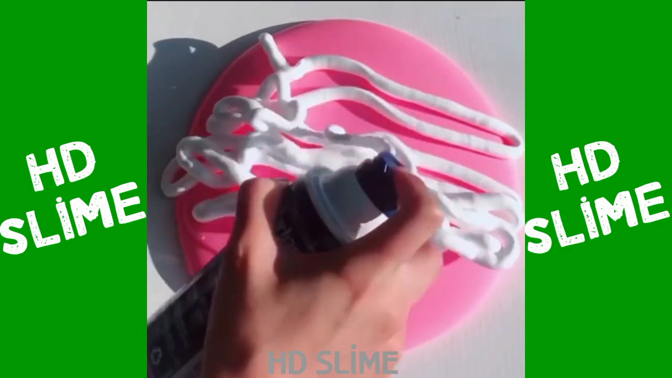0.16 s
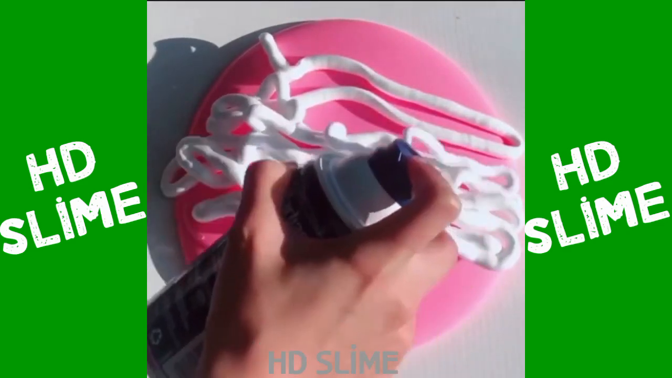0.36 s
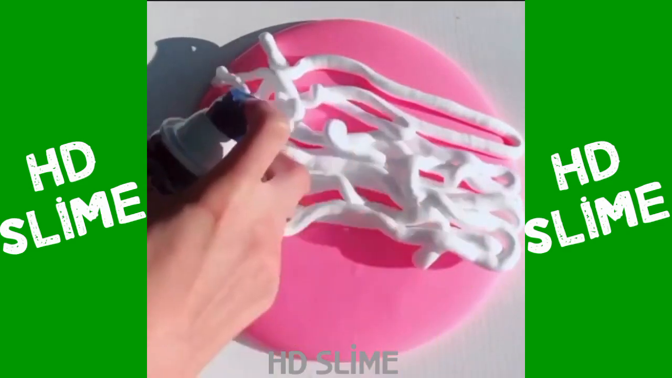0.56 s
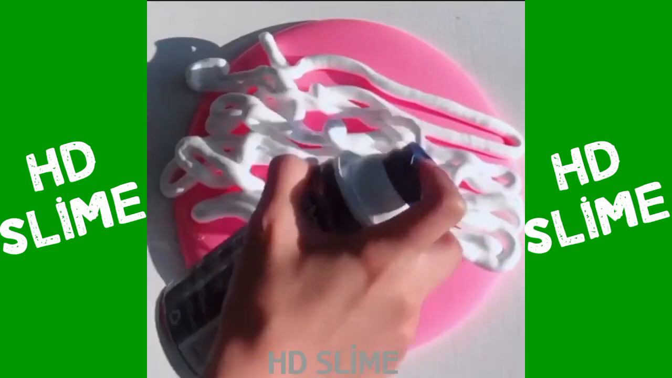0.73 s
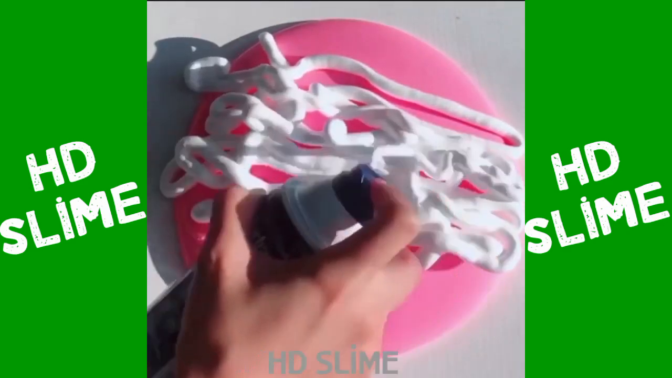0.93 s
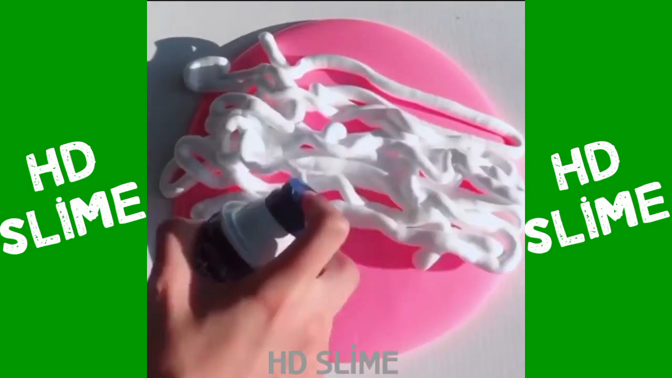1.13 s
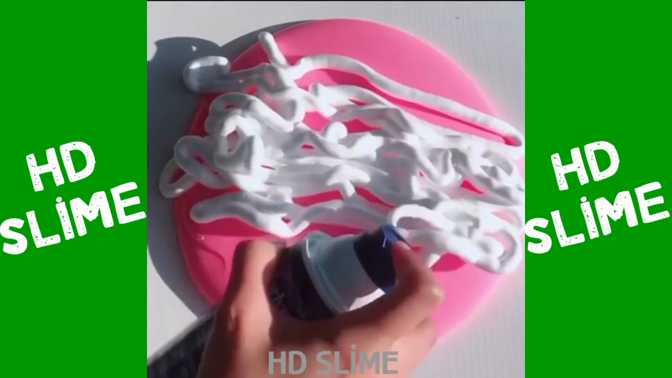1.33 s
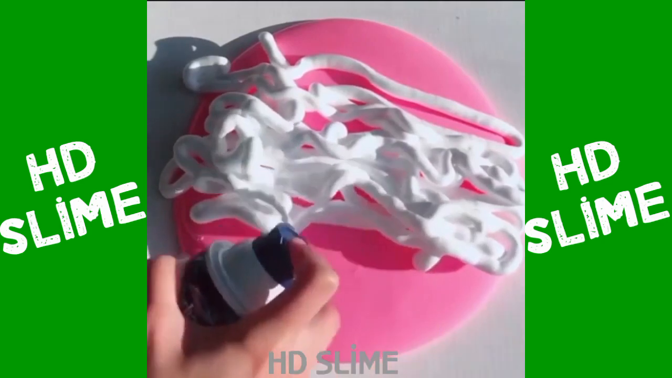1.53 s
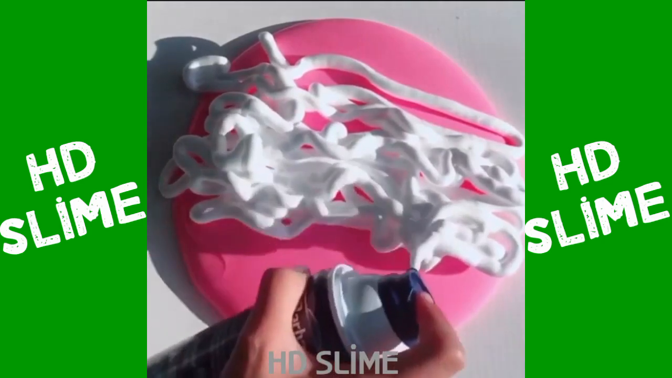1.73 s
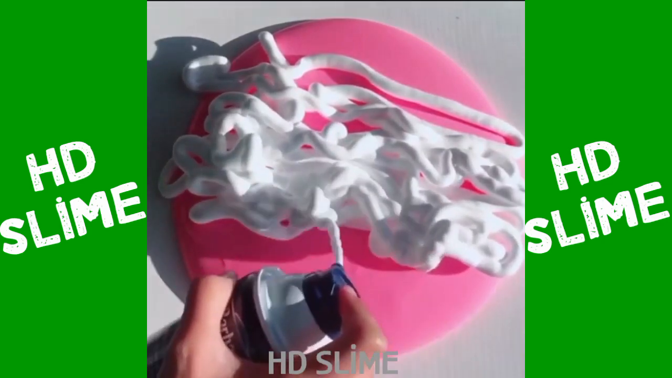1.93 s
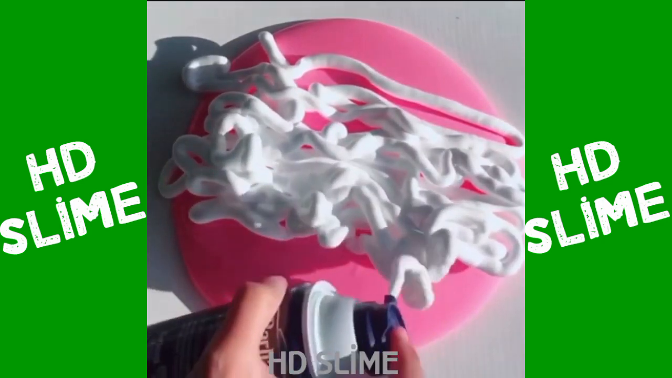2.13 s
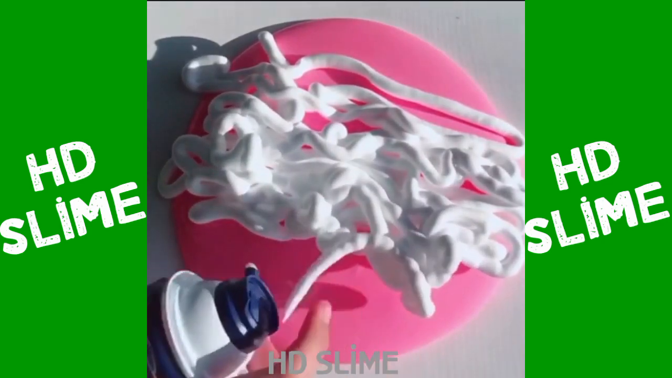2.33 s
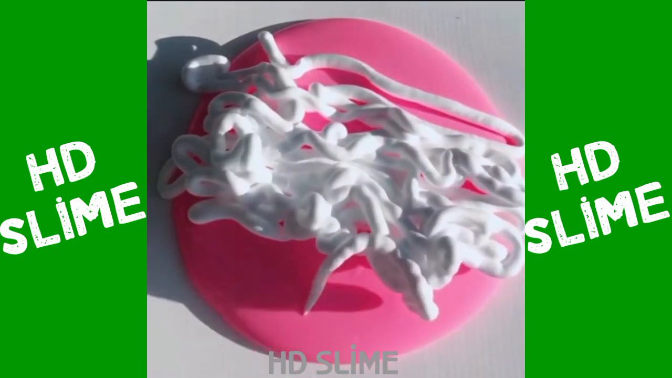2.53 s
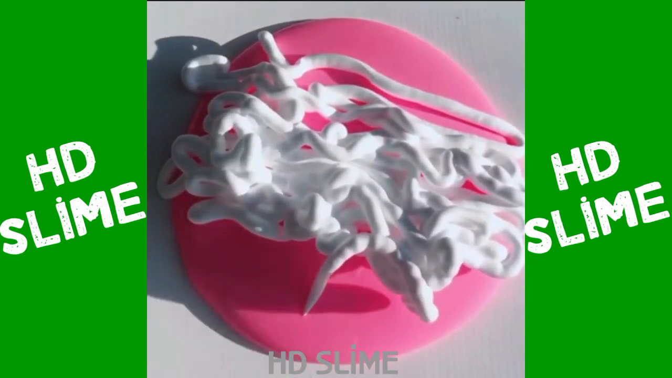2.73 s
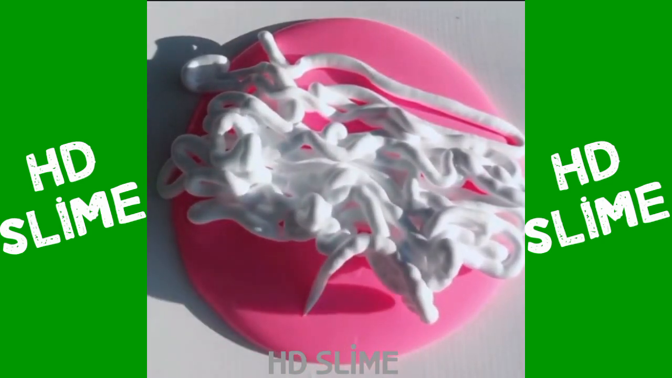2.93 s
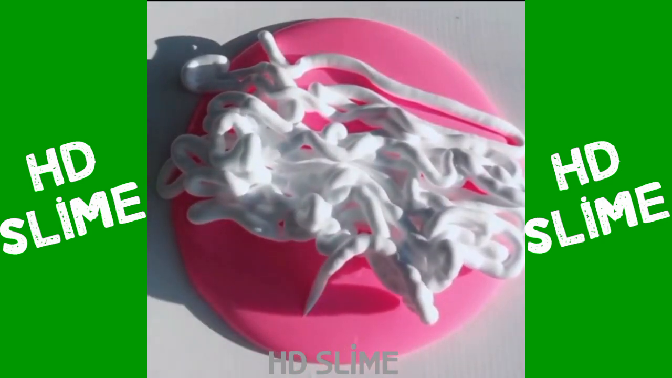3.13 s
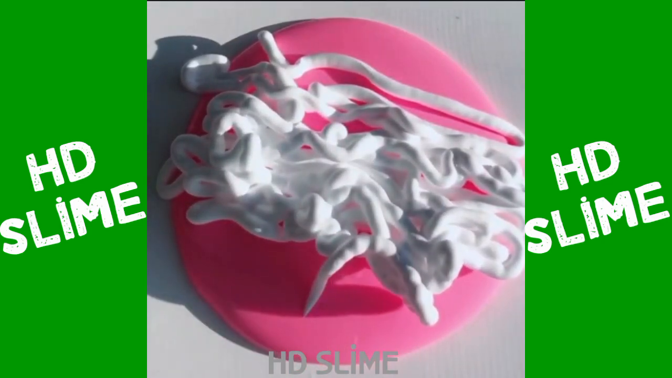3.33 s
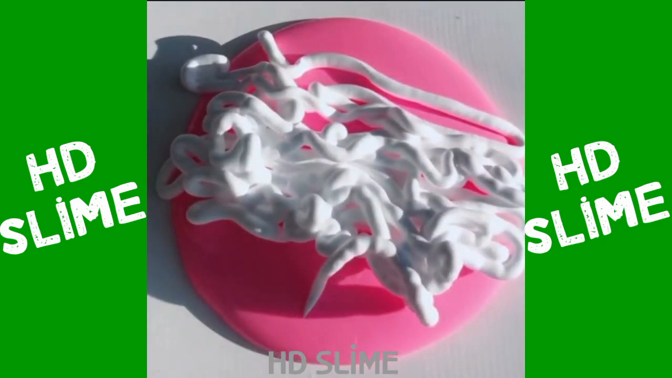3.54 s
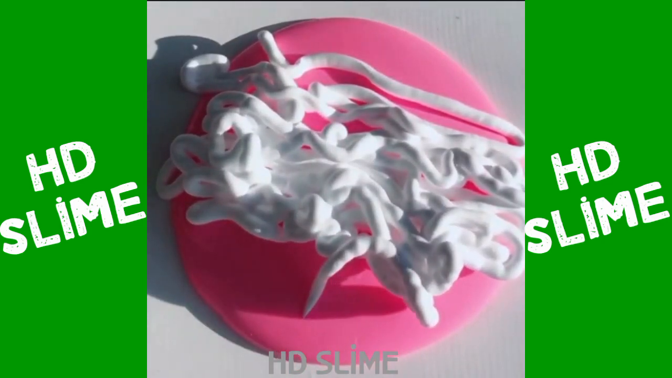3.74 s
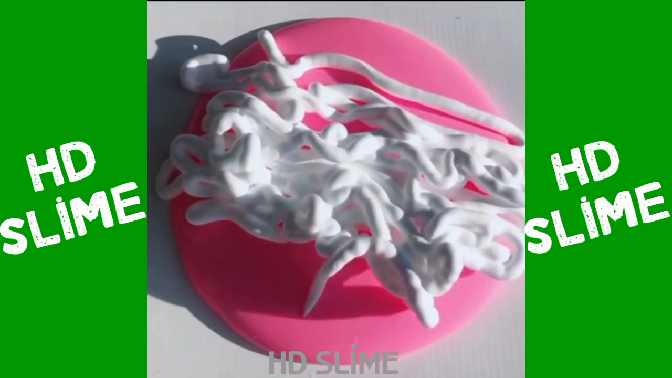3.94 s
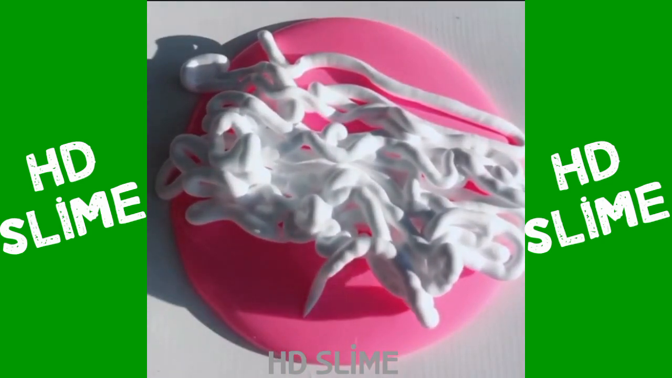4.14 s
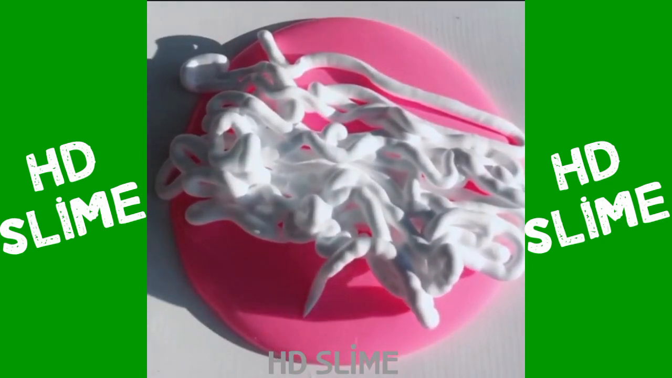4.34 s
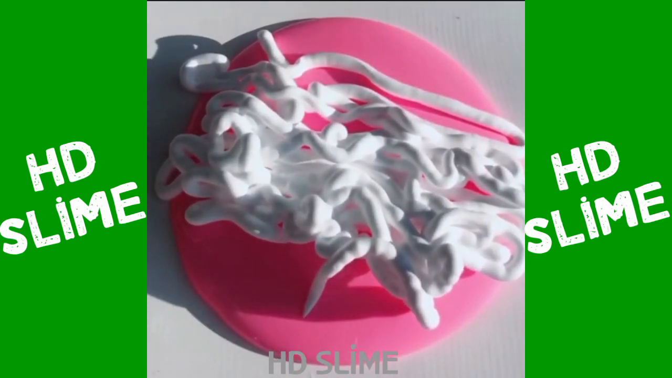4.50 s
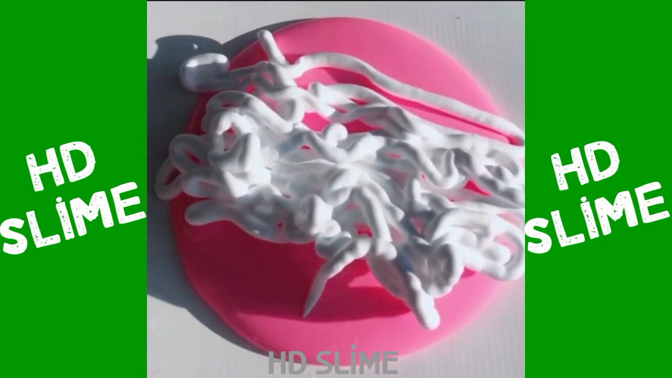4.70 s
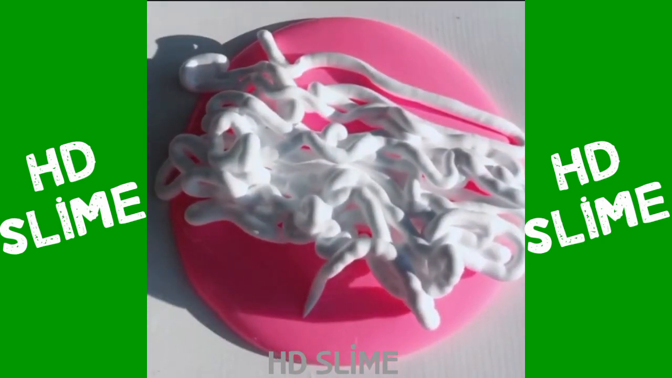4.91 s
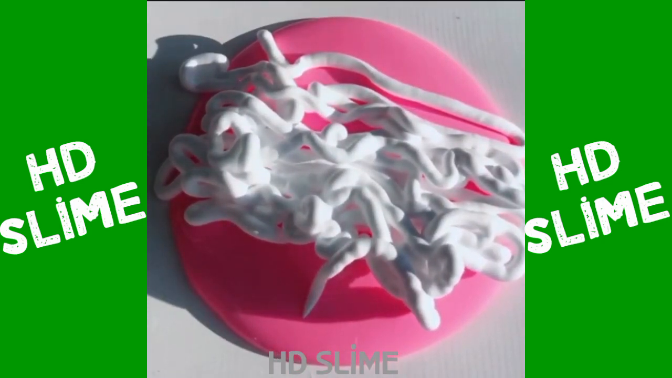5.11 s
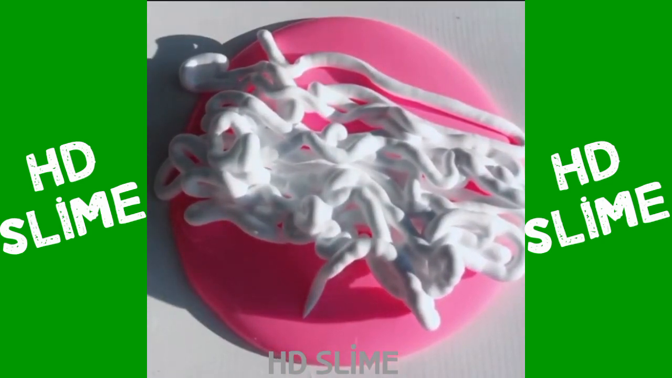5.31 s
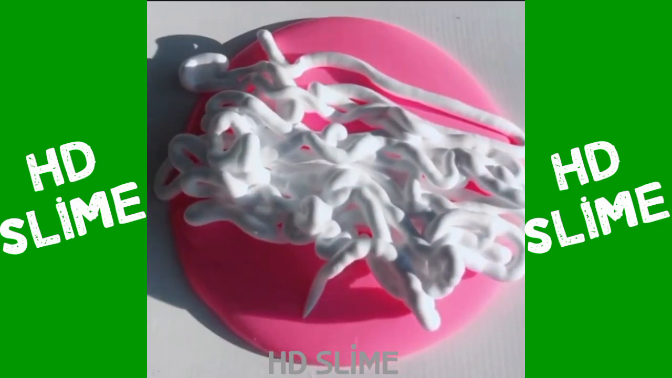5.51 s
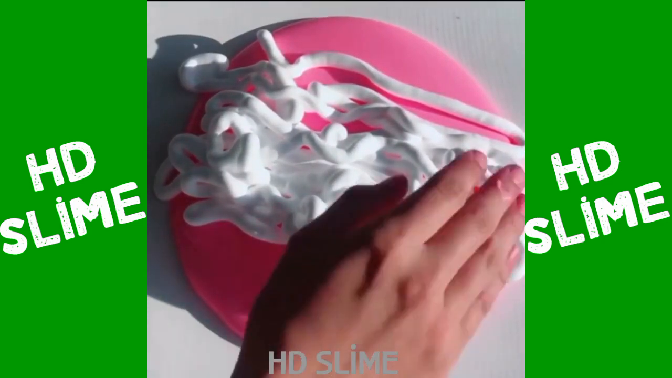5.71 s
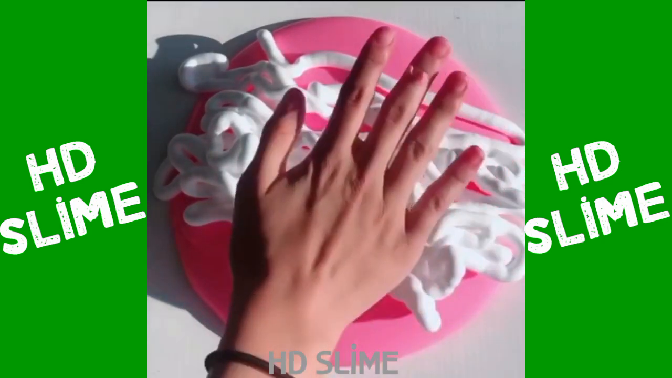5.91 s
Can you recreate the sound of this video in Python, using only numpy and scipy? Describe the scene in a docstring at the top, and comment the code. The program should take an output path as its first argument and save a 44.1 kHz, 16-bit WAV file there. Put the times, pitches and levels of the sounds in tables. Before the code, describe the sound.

Shaving foam jets from an aerosol already spraying at the start, hissing with a nasal spout resonance and fine crackle, gently pulsing as the hand sweeps. The valve closes quickly. The quiet indoor background holds soft hum, rumble and air, with delicate bubble ticks. Then the can knocks dully on the table, a light bump before a heavier thud, and isolated pops continue. Close, mono, slightly dull on top.

```python
"""An aerosol can lays shaving foam onto slime for about two seconds, close to a mono phone microphone.
At first the jet hisses through the spout's resonances, crackling with tiny bubbles, until the valve shuts.
Then the foam settles with faint ticks; from about 4 s the can slides and lands on the table in soft, hollow
thumps, and a few last bubbles pop. Room rumble, air hiss, a hum that later fades and a faint fizz lie beneath.
The spray is shaped noise and random bursts; the blows and bubbles are sets of decaying modes."""
import sys
import numpy as np
from scipy import signal
from scipy.fft import rfft, irfft
from scipy.io import wavfile
from scipy.ndimage import map_coordinates

SR = 44100
rng = np.random.default_rng(int(sys.argv[2]) if len(sys.argv) > 2 else 0)


def wrap_up_sound(samples):
    """Save the sound to the file named by the first command line argument, as 16-bit audio."""
    columns = np.atleast_2d(samples).T
    # keep every value between -1 and 1, then stretch to whole-number steps
    tamed = np.clip(columns, -1, 1)
    steps = np.round(tamed * 32767).astype(np.int16)
    wavfile.write(sys.argv[1], SR, steps)


N = 262816

# Voices of the spray, ahead of its final trim:
# [level upright/dB, swing with the sweep/dB, change when tipped/dB]
HISS_LEVEL = (-43, 0.29, 1.4)
SPOUT_LOW_LEVEL = (-46.5, 1.1, 1.0)
SPOUT_HIGH_LEVEL = (-46, 0.81, -9)
# Colour of the free jet: [f/Hz, relative level per Hz/dB]
JET_COLOUR = [(60, -13), (220, 0), (450, 0.5), (1400, -8), (1900, 0.5), (3100, 6.5), (5600, 1.5),
              (6600, 2.5), (7200, 4), (7800, 0), (8600, 3.5), (9500, 2.5), (10600, 0), (11300, 4),
              (11900, 1)]
# Spout resonances around two main tunings: [frequency ratio, width of one filter pass/Hz, relative level/dB]
SPOUT_LOW_MODES = [(.838, 140, -12.5), (.92, 280, -10), (1.0, 230, 0), (1.05, 232, -8)]
SPOUT_HIGH_MODES = [(.83, 230, -7.5), (1.0, 620, 0.5), (1.075, 382, -21)]
# The can tips onto its side towards the end: [t/s, tilt 0-1]
TILT = [(1.55, 0.01), (1.8, .45), (2.0, .85), (2.16, 1)]
# Spurts of foam make the main resonance flare or dip: [t/s, level change/dB]
SPURTS = [(.04, 1.5), (.09, -0.5), (.54, 5.5), (1.07, 5), (1.2, 4.5), (1.515, 4.5), (1.975, 7.5),
          (2.08, 3.5), (2.135, 4.5)]
# Foam builds up in the spout and fills out the sound below its main resonance:
# [f/Hz, width of one filter pass/Hz, level at the start/dB, growth/dB per s]
SPOUT_CLOG = (2143, 232, -61.5, 5)
# A thin edge whistle: [f/Hz, width of one filter pass/Hz, level against the hiss/dB, change when tipped/dB]
WHISTLE = (6950, 260, -21.5, 1.5)
# Gas pockets spit from the spout: [t/s, level/dB, f/Hz, width of one filter pass/Hz, half length/s]
SPITS = [(1.377, -52, 616, 900, .005), (2.134, -40, 2680, 580, .012)]
# The can meets the table: [t/s, thump level/dB, tap level/dB, table pitch ratio, table time ratio]
BLOWS = [(4.1519, -28.5, -35, 1.03, 0.77), (4.256, -42.5, -60, 0.92, 0.97), (4.302, -43, -41.5, 1.0, 0.77),
         (4.312, -33, -49, 1.04, 0.74), (4.4265, -15.5, -25, 1.0, 0.98), (4.477, -43, -41, 1.0, 1.6),
         (4.745, -36, -68, 0.49, 0.76)]
# Table modes, ahead of each blow's ratios: [f/Hz, relative level/dB, time to the top of the swell/s]
TABLE_MODES = [(104.5, -15.5, 0.02), (134, -18.5, 0.028), (172.5, 1.5, 0.014), (199.7, -17.5, 0.029),
               (291.4, -11, 0.017), (342, -17.5, .016), (596, -23, 0.01), (727, -25, 0.0069)]
# Modes of the can's rim: [f/Hz, relative level/dB, t60/s]
RIM_MODES = [(398, 6, 0.034), (824, -1.5, 0.022), (965, -7, 0.015), (1190, -9.5, 0.023),
             (1360, -7.5, 0.031), (1510, -11, 0.019), (1810, -15, 0.019), (2460, -19, .018)]
# The base slides before it lands: [t/s, level/dB, f/Hz, width of one filter pass/Hz, half length/s (sign unused)]
SLIDE = (4, -56, 650, 900, -0.05)
# Colour of the room's answer to a blow: [f/Hz, relative level per Hz/dB]
TAIL_COLOUR = [(60, -25), (170, 7), (240, -3), (320, -10), (500, -15), (800, -17.5), (1500, -22),
               (2200, -43), (5000, -55)]
# Larger bubbles burst in the foam: [t/s, level of the impulse that sets off the modes/dB]
POPS = [(3.050, -50), (3.357, -44), (3.666, -49), (4.689, -43), (5.2838, -29), (5.713, -49), (5.918, -42)]
# Modes of a bursting bubble: [f/Hz, relative level/dB, t60/s]
BUBBLE_MODES = [(4080, -14, 0.0081), (6170, -10.5, 0.0045), (7850, -8, 0.0027), (9300, -4, 0.0017),
                (11100, -16, 0.0045)]
# Patches of foam collapse with a fine fizz: [t/s, level/dB, half length/s]
FIZZES = [(2.77, -72, .05), (2.943, -64.5, 0.045), (5.4, -69, 0.053)]
# Colours of the room's rumble and air: [f/Hz, relative level per Hz/dB]
RUMBLE_COLOUR = [(15, -37), (30, -24), (40, -12), (52, 1.5), (64, -3), (76, -1.5), (88, -7.5), (125, -8),
                 (165, -11.5), (195, -15.5), (250, -18), (320, -15.5), (480, -26), (700, -60)]
AIR_COLOUR = [(300, -30), (500, -2), (660, 4.5), (1000, -2.5), (1700, -6.5), (2800, -7.5), (4300, -9),
              (4900, -13), (5500, -11.5), (7000, -15.5), (7800, -19), (9300, -17.5), (10500, -19.5),
              (11500, -21.5)]
# Room hum: [f/Hz, width of one filter pass/Hz, relative gain/dB]
HUM_BANDS = [(74.25, 9.2, -0.5), (129.9, 16.5, -8.5)]

VALVE_SHUT_S, VALVE_CLOSE_S = 2.164, 0.006  # moment; time constant of the close
SWEEP_S, FIRST_TURN_S = 0.505, 0.078  # the hand's round trip; first turn, where the swell peaks
SPOUT_LOW_HZ, SPOUT_HIGH_HZ = (2543, 2485), (4164, 4147)  # main tunings: upright, tipped
SPURT_HALF_S = 0.013
TABLE_LAG_S = 0.00192  # thump starts this long after the rim's tap
FIZZ_REST_DB = -76.5
RUMBLE_DB, AIR_DB = -47, -55.5
HUM_DB, HUM_HOLD_S, HUM_FADE_DB_PER_S = -49.5, 2.46, 6.5
CUTOFF_HZ = 11950


def spray():
    """Gas rushes through the spout; its voices swell with the hand, change with tilt and die with the valve."""
    t = np.arange(N) / SR
    sweep = np.cos(2 * np.pi * (t - FIRST_TURN_S) / SWEEP_S)
    tilt = np.interp(t, *np.transpose(TILT))

    def voice_db(upright_db, swing_db, tipped_db):
        """Level of one voice as the can sweeps and tips."""
        return upright_db + swing_db * sweep + tipped_db * tilt

    def tuning_hz(upright, tipped):
        """Resonance tuning glides as the can tips."""
        return upright + (tipped - upright) * tilt

    hiss_db = voice_db(*HISS_LEVEL)
    spurt_db = sum(db * swell(s, SPURT_HALF_S) for s, db in SPURTS)
    hiss = from_db(hiss_db + 0.42 * drift(10)) * coloured(turbulence(grain=1.0), JET_COLOUR)

    low = spout(SPOUT_LOW_MODES, tuning_hz(*SPOUT_LOW_HZ), flutter_db=0.6, wander=0.012)
    low *= from_db(voice_db(*SPOUT_LOW_LEVEL) + spurt_db)
    high = spout(SPOUT_HIGH_MODES, tuning_hz(*SPOUT_HIGH_HZ), flutter_db=1.3, wander=0.011)
    high *= from_db(voice_db(*SPOUT_HIGH_LEVEL))

    hz, width, start_db, growth = SPOUT_CLOG
    clog_db = start_db + growth * np.minimum(t, VALVE_SHUT_S) + 0.5 * spurt_db
    clog = from_db(clog_db) * noise_band(hz, width)

    hz, width, db, tipped_db = WHISTLE
    whistle_db = hiss_db + db + tipped_db * tilt + 3.8 * drift(4.3)
    whistle = from_db(whistle_db) * noise_band(hz, width)

    jet = hiss + low + high + clog + whistle
    for s, db, hz, width, half_s in SPITS:
        jet += from_db(db) * swell(s, half_s) * noise_band(hz, width)

    since_shut = np.maximum(t - VALVE_SHUT_S, 0)
    # A quick close over a quieter 50 ms tail; both hold steady until the valve shuts.
    valve = np.exp(-since_shut / VALVE_CLOSE_S) + from_db(-13.5) * np.exp(-since_shut / 0.05)
    trim = from_db(-1.06 + 0.22 * drift(70))
    return reflected(jet * valve * trim, strength=0.23, sway_s=0.0001)


def turbulence(grain):
    """Rushing gas as white noise, mixed with the bursts of expanding foam."""
    return rng.standard_normal(N) + grain * crackle(per_s=5000, spread_db=3.0)


def spout(modes, tuning_hz, flutter_db, wander):
    """The spout's resonances swell and shift as plugs of foam pass through; rms 1."""
    centre = np.mean(tuning_hz)
    out = np.zeros(N)
    for ratio, width, db in modes:
        gain = from_db(db + flutter_db * drift(20))
        out += gain * resonate(turbulence(grain=0.75), ratio * centre, width)
    # Reading faster or slower bends the pitch.
    speed = tuning_hz / centre * (1 + wander * drift(13.83))
    return rms_one(map_coordinates(out, [np.cumsum(speed)], order=3, mode="mirror"))


def reflected(x, strength, sway_s):
    """Hand, table and phone throw the hiss back along paths whose lengths waver slowly at random."""
    paths_s = (0.0009, 0.0022, 0.0031, 0.0048)
    echoes = np.zeros(N)
    for lag_s in paths_s:
        place = np.arange(N) - SR * (lag_s + sway_s * drift(1.5))
        echoes += map_coordinates(x, [place], order=3, mode="mirror")
    return (x + strength * echoes) / np.sqrt(1 + len(paths_s) * strength ** 2)


def can_on_table():
    """The can slides, its rim taps, the table's modes swell and fade, and the room answers with noise."""
    t = np.arange(SR // 2) / SR
    contact, tail_level = np.zeros(N), np.zeros(N)
    for s, thump_db, tap_db, pitch, ring in BLOWS:
        add(contact, s + TABLE_LAG_S, from_db(thump_db) * table_thump(t, pitch, ring))
        soft_onset = 1 - np.exp(-t / 0.001)
        add(contact, s, from_db(tap_db) * struck(RIM_MODES, t) * soft_onset)
        tail = np.exp(-t / 0.081) * (1 - np.exp(-t / 0.0039))
        add(tail_level, s, from_db(thump_db - 19.0) * tail)
    s, db, hz, width, half_s = SLIDE
    slide = from_db(db) * swell(s, half_s) * noise_band(hz, width)
    return contact + slide + tail_level * coloured(rng.standard_normal(N), TAIL_COLOUR)


def table_thump(t, pitch, ring):
    """Table modes swell to a peak and fade, scaled in pitch and time by the blow."""
    age = t / ring
    body = np.zeros(len(t))
    for hz, db, rise in TABLE_MODES:
        envelope = age / rise * np.exp(1 - age / rise)
        body += from_db(db) * envelope * np.sin(2 * np.pi * hz * pitch * t)
    return body


def settling_foam():
    """Impulses ring the modes of bursting bubbles: larger pops, faint ticks and a fine fizz."""
    burst = struck(BUBBLE_MODES, np.arange(SR // 20) / SR)
    clicks = from_db(-80) * crackle(per_s=220, spread_db=3.0)
    for s, db in POPS:
        add(clicks, s, from_db([db]))
    pops = signal.fftconvolve(clicks, burst)[:N]
    fizz = rms_one(signal.fftconvolve(crackle(per_s=3000, spread_db=0.5), burst)[:N])
    collapse = from_db(FIZZ_REST_DB) + sum(from_db(db) * swell(s, half_s) for s, db, half_s in FIZZES)
    return pops + collapse * fizz


def room_noise():
    """Shaped noise makes a low rumble, a wavering hum that fades, and soft air with a restless middle."""
    rumble = from_db(RUMBLE_DB + 1.0 * drift(2.6)) * coloured(rng.standard_normal(N), RUMBLE_COLOUR)
    hum = np.zeros(N)
    for hz, width, db in HUM_BANDS:
        hum += from_db(db) * resonate(rng.standard_normal(N), hz, width)
    hum_db = HUM_DB - HUM_FADE_DB_PER_S * np.maximum(np.arange(N) / SR - HUM_HOLD_S, 0)
    air = from_db(AIR_DB + 0.36 * drift(13)) * coloured(rng.standard_normal(N), AIR_COLOUR)
    restless = from_db(-64.0 + 3.25 * drift(20)) * noise_band(884, 940)
    return rumble + from_db(hum_db) * rms_one(hum) + air + restless


def crackle(per_s, spread_db):
    """Random single-sample bursts of uneven size and either sign; rms 1."""
    sizes = from_db(spread_db * np.minimum(rng.exponential(1, N), 4))
    hits = rng.random(N) < per_s / SR
    return rms_one(sizes * rng.choice([-1, 1], N) * hits)


def struck(modes, t):
    """Decaying sines set off at once, each in a random phase of its own."""
    out = np.zeros(len(t))
    for hz, db, t60 in modes:
        decay = np.exp(-np.log(1000) * t / t60)
        out += from_db(db) * decay * np.sin(2 * np.pi * (hz * t + rng.random()))
    return out


def resonate(x, hz, width_hz):
    """A steep resonance: two equal band-passes in a row, gain about 1 on top."""
    r = np.exp(-np.pi * width_hz / SR)
    b = (1 - r * r) / 2 * np.array([1, 0, -1])
    a = [1, -2 * r * np.cos(2 * np.pi * hz / SR), r * r]
    return signal.lfilter(b, a, signal.lfilter(b, a, x))


def noise_band(hz, width_hz):
    """White noise through one steep resonance; rms 1."""
    return rms_one(resonate(rng.standard_normal(N), hz, width_hz))


def coloured(x, points):
    """Shape a white signal's spectrum, with levels joined along log frequency; rms 1."""
    hz, db = np.transpose(points)
    bins = np.maximum(np.arange(N // 2 + 1) * SR / N, 1)
    gain = from_db(np.interp(np.log(bins), np.log(hz), db))
    return rms_one(irfft(rfft(x) * gain, N))


def drift(rate_hz):
    """Random wander: noise rolled off above a rate; rms 1."""
    bins = np.arange(N // 2 + 1) * SR / N
    return rms_one(irfft(rfft(rng.standard_normal(N)) / (1 + (bins / rate_hz) ** 2), N))


def swell(s, half_s):
    """A smooth rise and fall of height 1, down to 1/e at half_s either side."""
    return np.exp(-((np.arange(N) / SR - s) / half_s) ** 2)


def add(out, s, sound):
    """Mix a sound in at a time in seconds."""
    i = round(s * SR)
    out[i:i + len(sound)] += sound[:N - i]


def from_db(db):
    """Decibels to amplitude gain."""
    return 10 ** (np.asarray(db) / 20)


def rms_one(x):
    """Scale to unit power."""
    return x / np.sqrt(np.mean(x ** 2) + 1e-20)


def scene():
    """One microphone feeds both channels."""
    mono = spray() + can_on_table() + settling_foam() + room_noise()
    return np.tile(mono, (2, 1))


def record(dry):
    """A steep elliptic low-pass cuts the top."""
    low_pass = signal.ellip(12, 0.2, 80, CUTOFF_HZ, fs=SR, output="sos")  # order, ripple/dB, stop-band/dB
    return signal.sosfilt(low_pass, dry)


dry = scene()
out = record(dry)
wrap_up_sound(out)
```